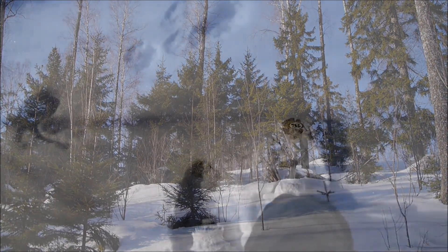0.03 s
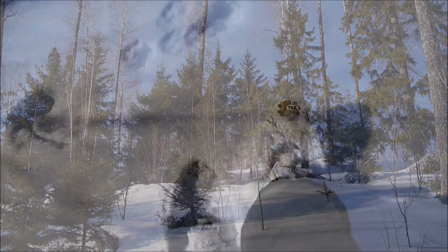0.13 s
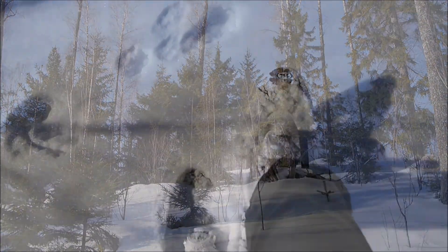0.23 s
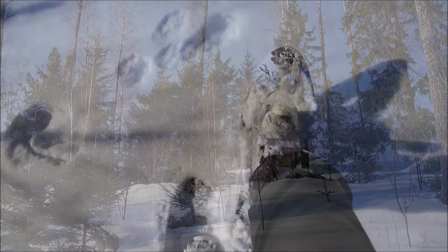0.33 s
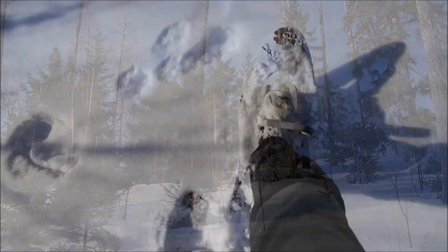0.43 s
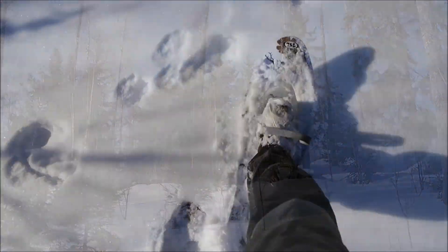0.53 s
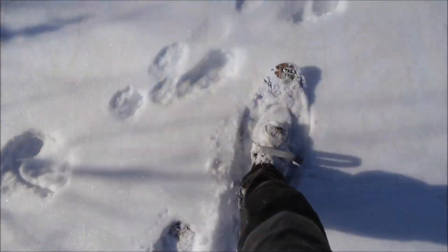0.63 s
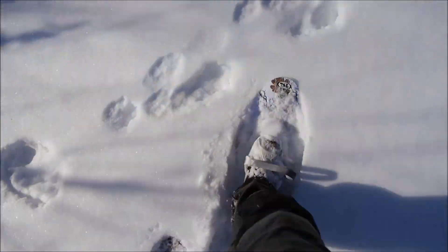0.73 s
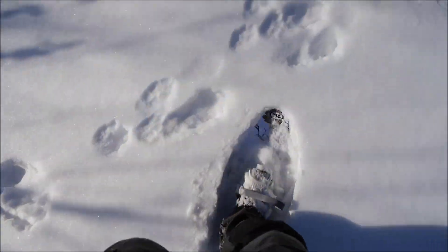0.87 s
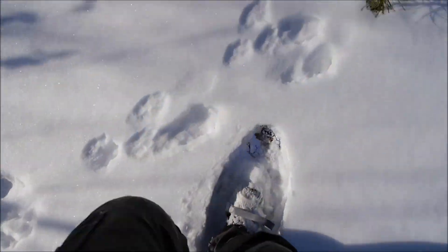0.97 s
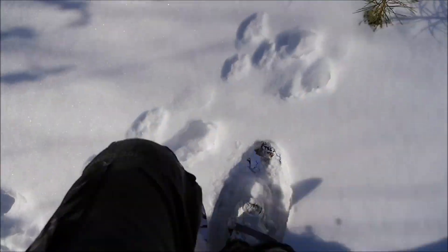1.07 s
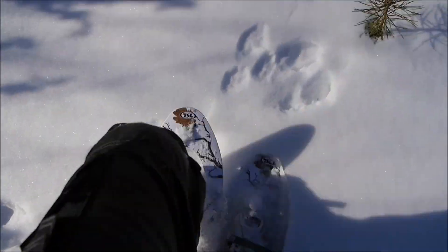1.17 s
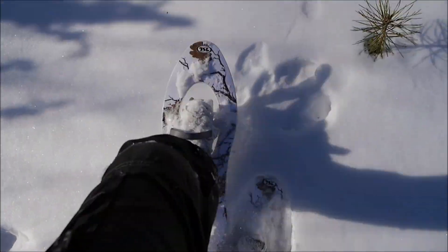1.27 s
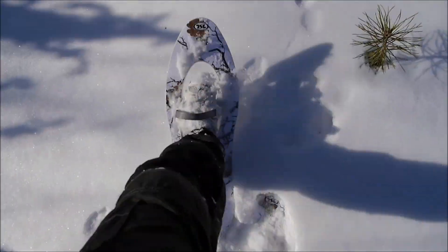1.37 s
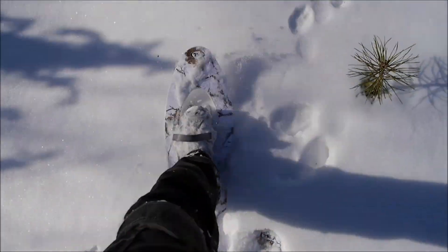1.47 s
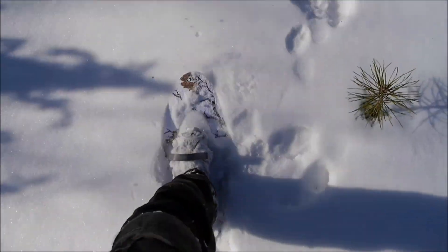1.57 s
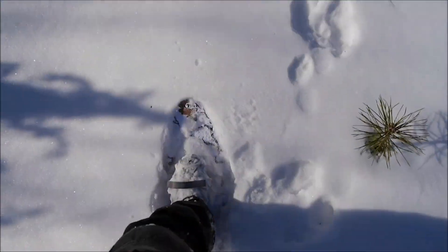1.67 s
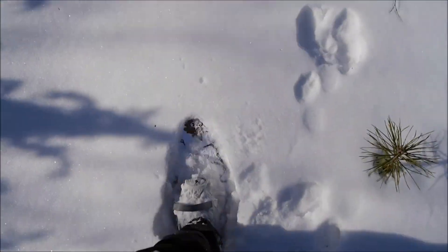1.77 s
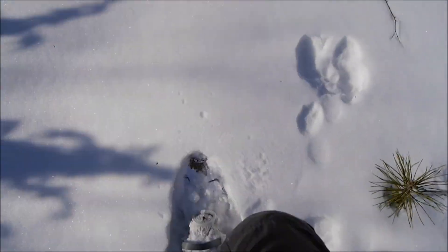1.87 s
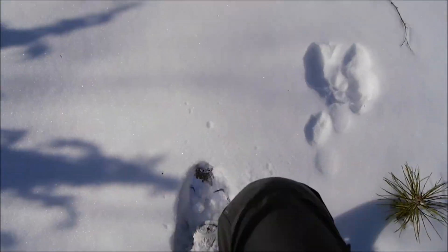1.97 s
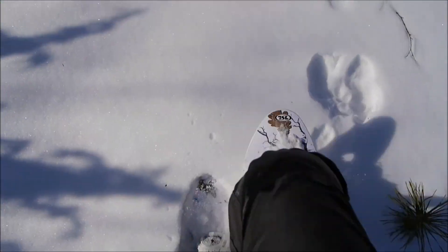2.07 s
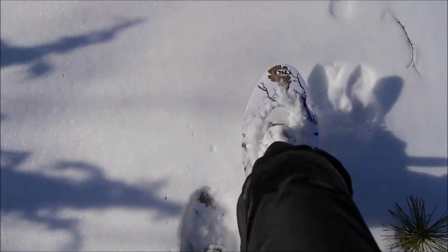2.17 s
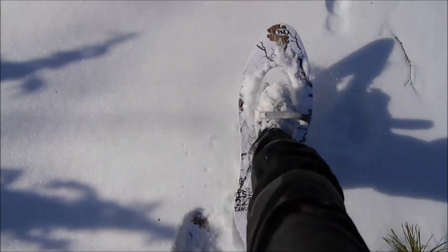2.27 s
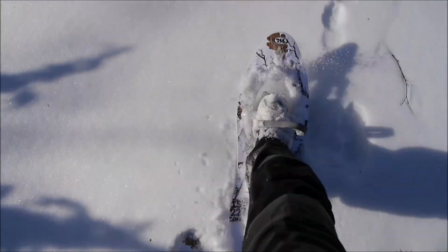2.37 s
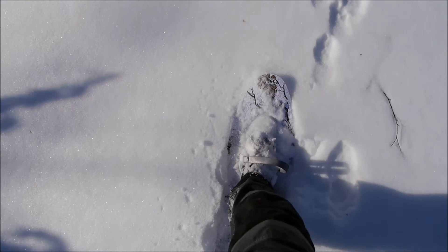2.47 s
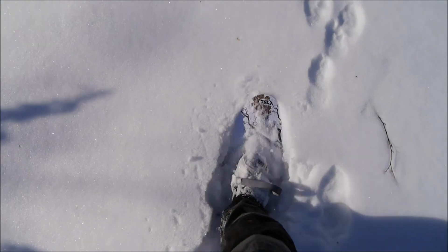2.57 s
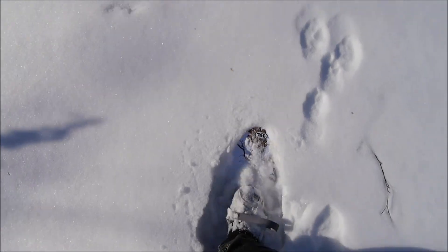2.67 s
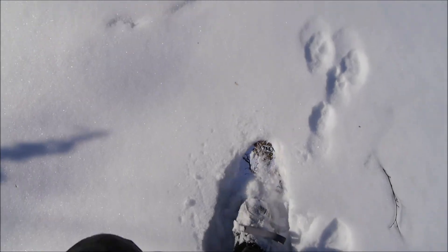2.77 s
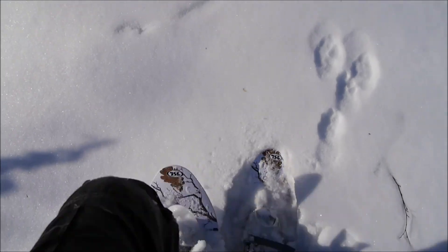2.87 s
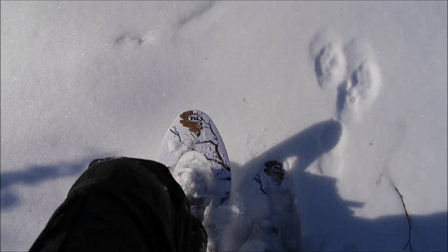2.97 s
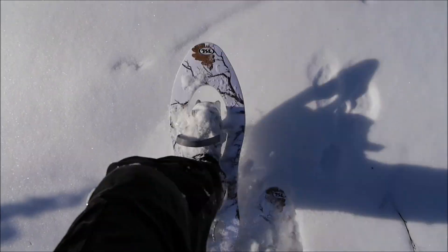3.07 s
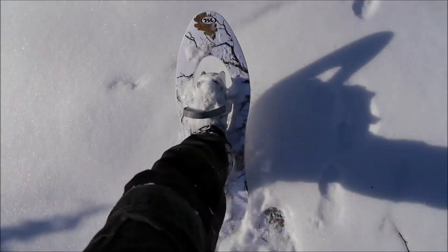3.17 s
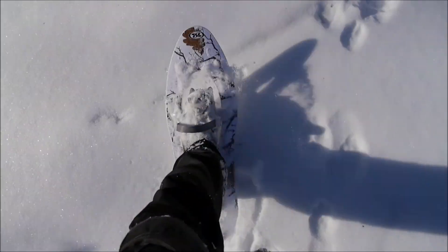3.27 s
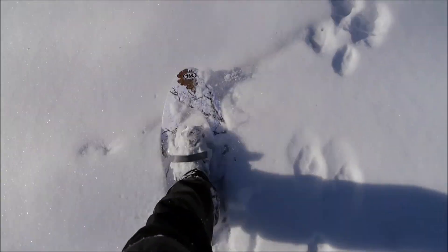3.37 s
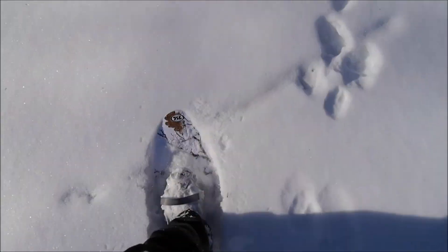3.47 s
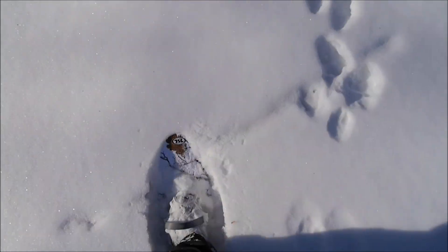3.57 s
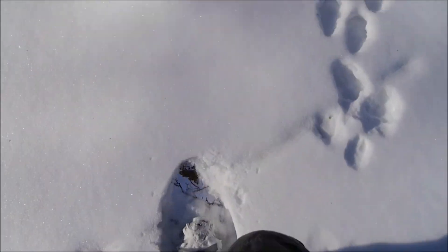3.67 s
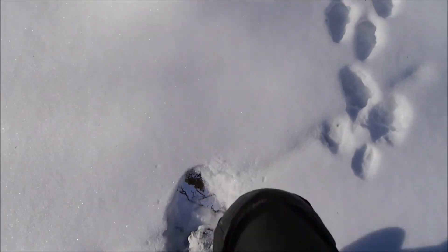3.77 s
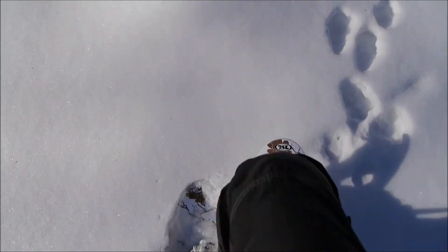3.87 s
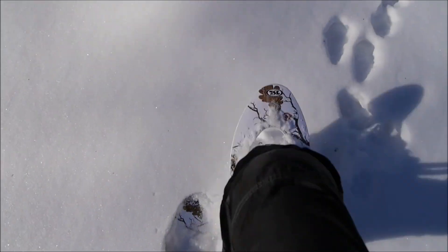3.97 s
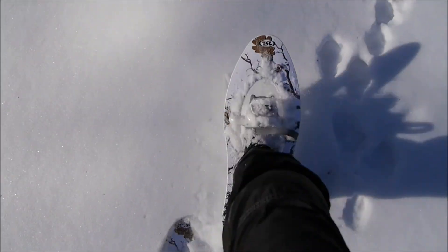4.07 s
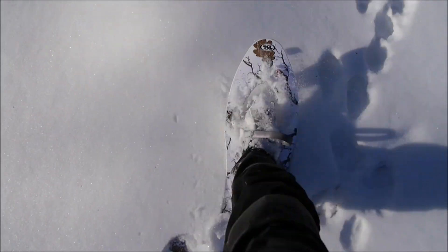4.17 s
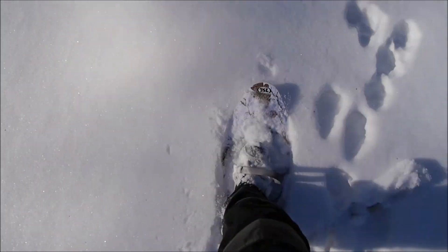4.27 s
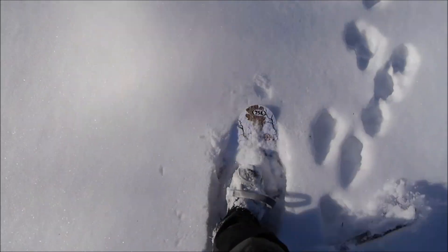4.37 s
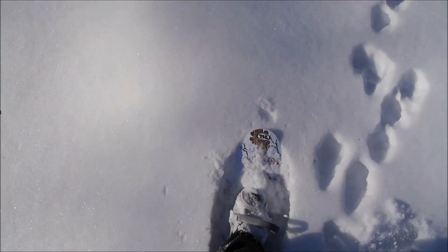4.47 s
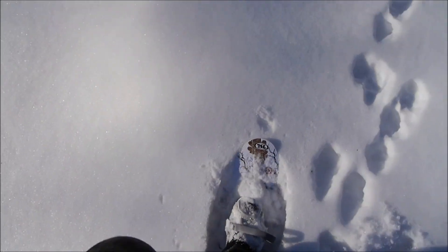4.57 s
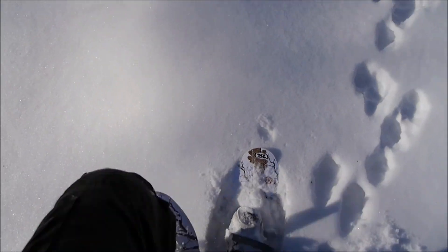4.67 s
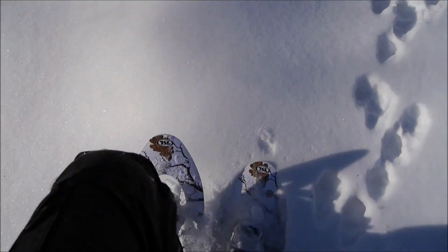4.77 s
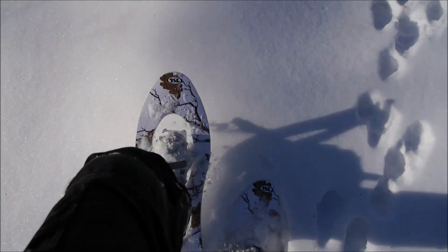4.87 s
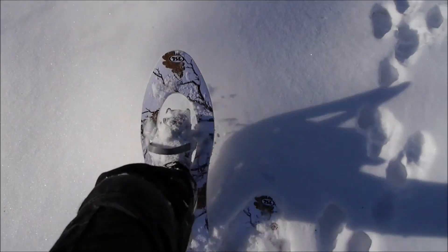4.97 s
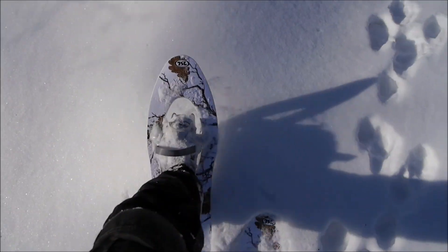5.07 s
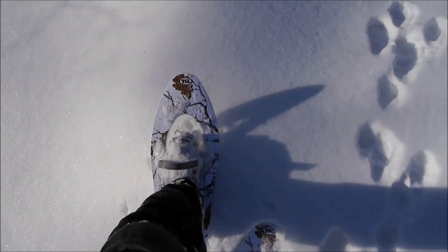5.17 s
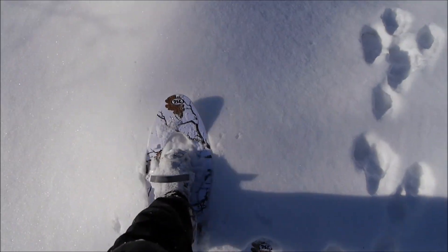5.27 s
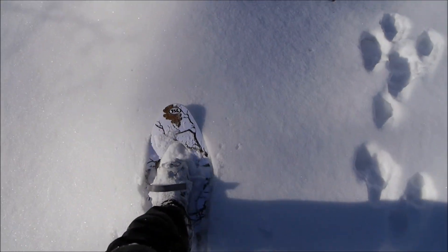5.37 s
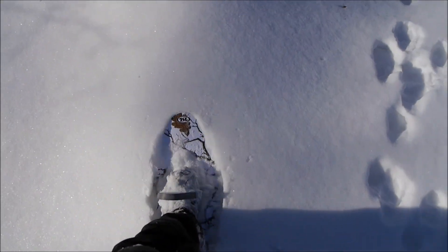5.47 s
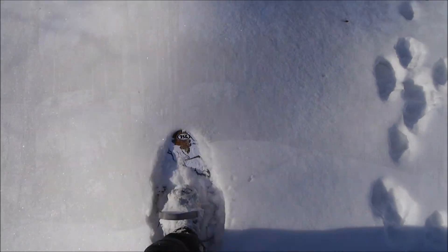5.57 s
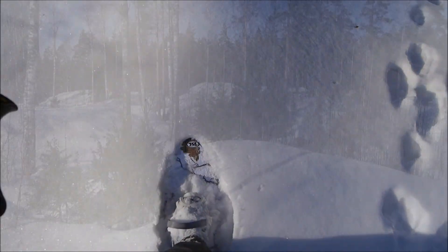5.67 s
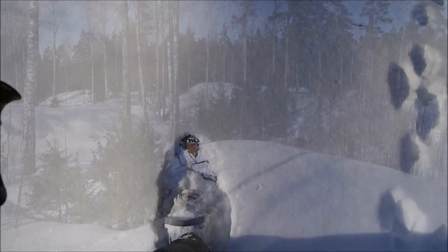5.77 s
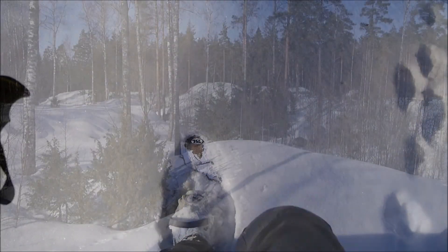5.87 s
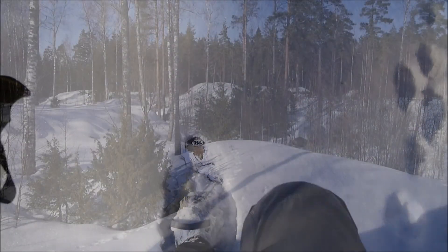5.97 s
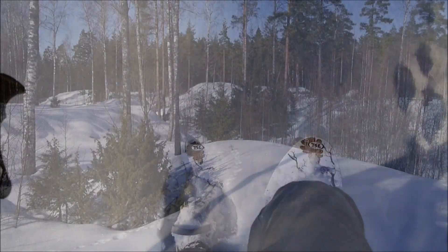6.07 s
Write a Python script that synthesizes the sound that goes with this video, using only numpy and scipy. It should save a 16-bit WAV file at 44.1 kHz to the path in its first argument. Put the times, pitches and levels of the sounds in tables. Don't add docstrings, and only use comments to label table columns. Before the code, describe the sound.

Six heavy, brittle snowshoe steps break icy crust with dry crackle, small knocks and soft low thuds in a nearly silent winter wood.

```python
import sys
import numpy as np
from scipy import signal
from scipy.fft import rfft, irfft, next_fast_len
from scipy.io import wavfile

SR = 44100
rng = np.random.default_rng(int(sys.argv[2]) if len(sys.argv) > 2 else 0)


def master_out(mix):
    frames = np.transpose(np.atleast_2d(mix))
    ceiling = np.clip(frames, -1, 1)
    pcm = np.round(ceiling * 32767).astype(np.int16)
    wavfile.write(sys.argv[1], SR, pcm)


def boost_factor(decibels):
    exponent = np.asarray(decibels, float) / 20
    return 10 ** exponent


N = 269451


def evened(x):
    return x / np.sqrt(np.mean(x ** 2) + 1e-20)


def spectrum_db(points, hz):
    f_hz, level_db = np.transpose(points)
    return np.interp(np.log(hz + 1), np.log(f_hz + 1), level_db)


def coloured(x, points):
    size = next_fast_len(N)
    gain = boost_factor(spectrum_db(points, np.fft.rfftfreq(size, 1 / SR)))
    return irfft(rfft(x, size) * gain, size)[..., :N]


def add(mix, start_s, sound):
    part = mix[:, round(start_s * SR):][:, :sound.shape[1]]
    part += sound[:, :part.shape[1]]


def ring(hz, cycles, phase=0):
    u = np.arange(int(6 * cycles / hz * SR) + 8) / SR * hz / cycles
    x = np.sqrt(u) * np.exp(-2.5 * u) * np.sin(2 * np.pi * cycles * u + phase)
    x = np.diff(x, append=0)
    return x / abs(x).max()


# t/s, left-right level/dB
LEAN = [(0.57, -5.5), (1.63, -0.5), (2.54, -6.5), (2.88, 0), (3.23, -5), (3.47, -0.5), (4.42, -6),
        (4.73, 1.5), (4.99, -4.5), (5.44, 1), (5.95, -3.5), (6.1, -3)]


def lean_db(t_s):
    shift_s, balance_db = np.transpose(LEAN)
    return np.interp(t_s, shift_s, balance_db)


# t/s, length/s, crust level/dB, packing re crust/dB, fizz re crust/dB
PRESSES = [(0.639, 0.17, -24.5, -6.5, 0.5), (0.799, 0.27, -28.5, 1, -3.0), (1.598, 0.14, -25, -1, 2.0),
           (1.722, 0.24, -26.0, 0.5, -3), (2.46, 0.16, -22.5, -6.5, -2), (2.595, 0.2, -25.5, -0.5, -1.5),
           (3.45, 0.11, -21.0, -4, 0.5), (3.544, 0.191, -26.5, -1, 0.5), (4.293, 0.16, -25, -4, 0),
           (4.423, 0.19, -29.5, 1, -6.0), (5.245, 0.251, -25, -4.5, -2.5), (5.509, 0.33, -30.5, 1.5, -2.5)]
CUTS = [(0.585, 0.065, -29.5, -4, -8.0), (1.367, 0.23, -27.0, -5.5, -6.5), (2.26, 0.19, -27.5, -4.5, -9),
        (3.242, 0.18, -28.5, -7, -5.5), (4.073, 0.15, -31.5, -5, -8.5), (5.077, 0.1, -31.5, -9.0, -7)]
DRAGS = [(1.121, 0.018, -39.0, -0.5, -6), (1.172, 0.1, -34.5, -5, -6.5), (1.316, 0.052, -49.5, 7.5, -1.5),
         (1.962, 0.19, -36, -3, -7.0), (2.813, 0.12, -43.0, 1, -2), (2.882, 0.15, -32.0, -3.5, -3.5),
         (3.099, 0.04, -38.5, -2.5, -3), (3.729, 0.17, -37, -3, -4), (3.858, 0.16, -35.5, -6.5, -8.5),
         (4.253, 0.047, -33, -4, -4), (4.649, 0.082, -45.0, 3, -5), (4.867, 0.089, -37.5, -2.5, -0.5),
         (5.193, 0.092, -33.5, -3.0, -6), (5.853, 0.072, -39.5, 0, -0.5), (5.984, 0.059, -45, -1, -14.5)]
SCUFFS = [(0.556, 0.029, -23.5, -7, -10), (0.668, 0.012, -23, -13.5, -18),
          (1.249, 0.046, -27.0, -6.5, -5.5), (1.603, 0.031, -23.5, -2, 1), (2.178, 0.02, -27, -9.5, -12.5),
          (2.504, 0.029, -23, -10, -3), (2.945, 0.019, -29.5, 2, -4.5), (3.052, 0.017, -25.0, -9, -5),
          (3.085, 0.005, -36.5, -11, 9.0), (3.141, 0.017, -30, 1, -4.0), (3.203, 0.024, -23.5, -9.5, -7),
          (3.428, 0.046, -22.0, -3.5, -4), (3.69, 0.019, -28.0, -13, 3), (3.992, 0.007, -33, -15, -13.0),
          (4.126, 0.004, -31, -2, -11.5), (4.238, 0.015, -20.0, -5.5, -6.5), (4.294, 0.039, -19.5, -15, -5),
          (4.592, 0.037, -37.5, -2, 3.0), (4.711, 0.018, -36.5, 2.0, -8), (4.788, 0.1, -26.5, -6.5, -5.5),
          (4.932, 0.048, -33.5, -1, -2), (5.013, 0.064, -31.0, 1, -4.0), (5.333, 0.011, -25.5, -7.0, -5),
          (5.936, 0.009, -32.5, -0.5, -11)]
# rise/s, release/(dB/s), drift of packing, crust, fizz over the move/dB
PRESS_SHAPE = (0.0456, 353, 0.86, -4.4, -7.5)
CUT_SHAPE = (0.035, 310, 4.2, 4.5, 4)
DRAG_SHAPE = (0.026, 350, 4.4, 3.3, 1.3)
SCUFF_SHAPE = (0.0073, 530, 0.45, 0.67, 0.96)
# packing, crust, fizz level/dB
SETTLE_DB = (-49.3, -45, -48.2)
# t/s, peak level/dB, f/Hz, cycles, rumble level/dB
THUDS = [(0.806, -22, 242, 0.73, -37), (1.261, -25, 257, 1.7, -49), (1.697, -16.5, 370, 2.7, -60),
         (1.781, -15.5, 213, 1.8, -46.5), (2.577, -25, 220, 2.8, -38), (2.903, -21.5, 385, 1, -47),
         (3.007, -36, 425, 2, -54), (3.151, -32.5, 231, 2, -57), (3.525, -13, 270, 0.62, -44),
         (4.234, -20, 360, 0.93, -54), (4.307, -19, 458, 1.1, -51), (4.355, -32, 250, 1.4, -48),
         (4.813, -22.5, 400, 1.5, -52.5), (5.539, -23, 263, 3, -49)]
SETTLE_S = 0.56
RUMBLE_DB, PACK_DB, FIZZ_DB = -2.5, 2.5, 4
SHAKE_DB, SHAKE_S = 25, 0.029


def load():
    t = np.arange(0, N + 64, 64) / SR
    power = (t >= SETTLE_S) * boost_factor(np.array(SETTLE_DB)[:, None]) ** 2 + 1e-12
    kinds = [(PRESSES, PRESS_SHAPE), (CUTS, CUT_SHAPE), (DRAGS, DRAG_SHAPE), (SCUFFS, SCUFF_SHAPE)]
    for moves, (rise_s, release_db_per_s, *drift_db) in kinds:
        for start_s, length_s, crust_db, pack_db, fizz_db in moves:
            progress = np.clip((t - start_s) / length_s, 0, 1)
            db = crust_db + np.array([[pack_db], [0], [fizz_db]])
            db = db + np.array(drift_db)[:, None] * progress
            db = db - release_db_per_s * np.maximum(t - start_s - length_s, 0)
            rise = np.clip((t - start_s) / rise_s, 0, 1)
            power = power + (boost_factor(db) * rise) ** 2
    shake = np.zeros(len(t))
    for start_s, *_, rumble_db in THUDS:
        swell = np.exp(-((t - start_s - SHAKE_S / 2) / SHAKE_S) ** 2)
        shake += boost_factor(rumble_db + SHAKE_DB) ** 2 * swell
    pack, crust, fizz = power
    rumble = boost_factor(RUMBLE_DB) ** 2 * pack + shake
    layers = [rumble, boost_factor(PACK_DB) ** 2 * pack, crust, boost_factor(FIZZ_DB) ** 2 * fizz]
    return [np.interp(np.arange(N) / SR, t, 10 * np.log10(row)) for row in layers]


def slips(per_s, depth_db, fade_s):
    jumps = (rng.random(N) < per_s / SR) * rng.exponential(1, N)
    x = signal.lfilter([1], [1, -np.exp(-1 / (fade_s * SR))], jumps)
    return depth_db * evened(np.tanh(0.7 * evened(x - x.mean())))


def crackle(load_db, per_s=110, level_db=44):
    out = np.zeros((2, N))
    for hz in (1500, 2360, 3530, 4900):
        chance, odds, sign, place = rng.random((4, N))
        struck = chance < per_s / 4 / SR
        size = struck * boost_factor(-3.5 * np.log(odds + 0.06)) * np.sign(sign - 0.5)
        train = size * boost_factor(load_db + level_db)
        both = np.array([train, train * np.sign(place - 0.5)])
        out += signal.oaconvolve(both, ring(hz, 1.7)[None])[:, :N]
    return out


# f/Hz, level/dB per Hz
SNOW = [(35, -50), (60, -15.5), (146, -13), (217, -2.5), (338, 2), (566, -2.5), (785, 3), (1170, -1.5),
        (2970, -5.5), (6740, -11), (10800, -13), (14600, -34), (16000, -118)]
LAYERS_HZ = (110, 600, 2600, 9000)
# f/Hz, side-mid level/dB
CRUNCH_SPREAD = [(60, -11), (150, -7.5), (380, -47), (950, -26), (2380, -4.5), (5980, -2.5), (15000, -3)]
SQUEAK_HZ, SQUEAK_PER_DB, SQUEAK_AT_DB = 2950, 0.02, -6.5


def crunch(count=30):
    layers_db = load()
    clumps_db = [slips(25, 1, 0.018), slips(47, 0.8, 0.014), slips(71, 1.1, 0.015), slips(91, 0.9, 0.015)]
    shared_db = slips(35, 1.03, 0.04)
    finer_db = layers_db[3] - layers_db[2] - FIZZ_DB - SQUEAK_AT_DB
    squeak_log_hz = np.log(SQUEAK_HZ) + SQUEAK_PER_DB * finer_db
    mid_side = np.zeros((2, N))
    for hz in np.geomspace(70, 15000, num=count):
        shares = [np.interp(np.log(hz), np.log(LAYERS_HZ), row) for row in np.eye(4)]
        per_s = 330 * (hz / 1000) ** 0.75
        at = np.flatnonzero(rng.random(N) < per_s / SR)
        load_db = shared_db[at]
        for share, layer_db, clump_db in zip(shares, layers_db, clumps_db):
            load_db = load_db + share * (layer_db[at] + clump_db[at])
        load_db += 3.5 * np.exp(-((np.log(hz) - squeak_log_hz[at]) / 0.25) ** 2)
        odds, sign, place = rng.random((3, len(at)))
        size = boost_factor(-2.4 * np.log(odds + 0.038)) * np.sign(sign - 0.5)
        grain = ring(hz, 3.08, rng.uniform(0, np.pi))
        per_grain = np.sqrt(hz * N / len(at)) / np.linalg.norm(grain)
        train = evened(size) * boost_factor(load_db + spectrum_db(SNOW, hz)) * per_grain
        both = np.zeros((2, N))
        both[:, at] = train, train * np.sign(place - 0.5)
        mid_side += signal.oaconvolve(both, grain[None])[:, :N]
    mid_side += crackle(layers_db[2] + shared_db)
    mid = mid_side[0]
    side = boost_factor(-2.5) * coloured(mid_side[1], CRUNCH_SPREAD)
    lean = boost_factor(lean_db(np.arange(N) / SR) / 2)
    high = signal.lfilter(*signal.butter(1, 1100, "high", fs=SR), mid)
    left = mid + side + (lean - 1) * high
    right = mid - side + (1 / lean - 1) * high
    return boost_factor(-40.5) * np.array([left, right])


# t/s, peak level/dB, f/Hz, splinter re peak/dB
SNAPS = [(0.561, -8.5, 3100, -11), (0.57, -9, 2980, -18), (0.664, -15, 3900, -5), (0.705, -16, 4750, -13),
         (1.14, -22, 3600, -14), (1.234, -14, 1770, -22.5), (1.339, -22, 1280, -27),
         (1.373, -15.5, 1520, -19), (1.431, -10, 2370, -10), (1.561, -11, 2670, -18),
         (2.308, -10, 1730, -25), (2.431, -12, 2440, -18), (2.52, -6, 1720, -21), (3.474, -9, 3900, -14),
         (3.344, -9.5, 3080, -8), (3.441, -3.5, 4400, -18), (3.462, -4.5, 3920, -7),
         (4.142, -3.5, 1430, -23), (4.167, -12.5, 2540, -28), (4.185, -14, 2790, -10),
         (4.298, -11, 1630, -13), (4.432, -8.5, 4070, -13), (4.798, -11, 4120, -21),
         (4.836, -11.5, 1880, -4.5), (4.868, -14, 2500, -14), (5.099, -11, 2410, -13),
         (5.256, -12, 1830, -20), (5.337, -10, 1540, -6)]
# t/s, peak level/dB, f/Hz, splinter re peak/dB
SQUEALS = [(2.267, -11, 2400, -27), (3.064, -11, 4900, -25), (3.093, -16, 5400, -10),
           (3.211, -7, 2700, -18), (3.219, -7, 2720, -18), (3.285, -14, 2750, -20), (3.325, -15, 2800, -20),
           (4.11, -17, 2800, -15), (4.81, -12, 3000, -18), (4.862, -12, 5400, -16), (4.89, -14, 4800, -16),
           (5.165, -14, 3100, -18)]
# t/s, peak level/dB, splinter re peak/dB
KNOCKS = [(0.845, -11, -12), (1.121, -17.5, -25), (1.16, -19.5, -20), (1.217, -19, -20), (1.786, -9, -8),
          (1.874, -19, -16), (2.132, -19, -10), (2.337, -13.5, -23), (2.547, -11, -2), (2.584, -12.5, 0),
          (2.909, -12, -12), (2.948, -13, -22), (3.624, -14, -3), (3.658, -18, 6.5), (3.675, -21, 7),
          (3.708, -18.5, 8.5), (3.818, -23, -4), (3.953, -21, -25), (4.237, -12, -5), (4.605, -15, -11),
          (4.733, -21, -25), (4.819, -11, -14), (5.028, -20, -6), (5.118, -15.5, -4), (5.3, -13, -14),
          (5.386, -12.5, -7), (5.426, -12, -23), (5.544, -23, 6), (5.803, -13.5, -29), (5.937, -14.5, -33)]
SNAP_T60_S, SNAP_CYCLES = 0.031, 3.3
SQUEAL_T60_S, SQUEAL_CYCLES = 0.05, 9
KNOCK_T60_S, KNOCK_HZ = 0.027, 793


def snaps():
    out = np.zeros((2, N))
    t = np.arange(3000) / SR
    tick = ring(3800, 1.3)
    splinter_band = signal.butter(2, [4500, 12000], "band", fs=SR)
    plates = [(*row, SNAP_T60_S, SNAP_CYCLES) for row in SNAPS]
    plates += [(*row, SQUEAL_T60_S, SQUEAL_CYCLES) for row in SQUEALS]
    plates += [(s, db, KNOCK_HZ, rel_db, KNOCK_T60_S, SNAP_CYCLES) for s, db, rel_db in KNOCKS]
    for start_s, peak_db, hz, splinter_db, t60_s, cycles in plates:
        noise = rng.standard_normal((4, len(t)))
        fade = boost_factor(-60 * t / t60_s) * np.minimum(t / 0.00049, 1)
        crack = ring(hz, 1.8)[:len(t)]
        crack[:len(tick)] += 0.45 * tick[:len(crack)]
        crumble = boost_factor(-12) * evened(signal.lfilter(ring(hz, cycles), 1, noise[0])) * fade
        crumble[:len(crack)] += boost_factor(-5) * crack
        bright = evened(signal.lfilter(*splinter_band, noise[1] + 0.92 * noise[2:]))
        splinters = boost_factor(splinter_db - 4.5) * bright * fade * np.minimum(t / 0.003, 1)
        pan_db = lean_db(start_s) / 2
        add(out, start_s, boost_factor(peak_db) * (crumble + splinters) * boost_factor([[pan_db], [-pan_db]]))
    return out


def thuds():
    out = np.zeros((2, N))
    for start_s, peak_db, hz, cycles, _ in THUDS:
        push = boost_factor(peak_db + 3) * ring(hz, cycles)
        add(out, start_s + 0.00284, push * boost_factor([[1.2], [-1.2]]))
    return out


# f/Hz, level/dB per Hz
AIR = [(18, -55), (30, -25), (81, -25), (215, -4.5), (512, -0.5), (1860, -9), (2120, -8), (2610, -11.5),
       (9220, -23), (14800, -28), (16000, -21)]
# f/Hz, side-mid level/dB
AIR_SPREAD = [(60, 0), (240, -1), (950, 7.5), (3770, 11), (15000, -2)]
AIR_DB = -58


def air():
    mid, side = coloured(rng.standard_normal((2, N)), AIR)
    side = coloured(side, AIR_SPREAD)
    return boost_factor(AIR_DB) * np.array([mid + side, mid - side]) / mid.std()


def scene():
    return crunch() + snaps() + thuds() + air()


def top_cut(x):
    return signal.sosfilt(signal.butter(12, 17040, fs=SR, output="sos"), x)


def record(dry):
    wind_cut = signal.butter(1, 50, "high", fs=SR, output="sos")
    band_limit = signal.firwin(601, 15820, window=("kaiser", 8), fs=SR)
    mix = signal.sosfilt(wind_cut, dry)
    mix = signal.oaconvolve(mix, band_limit[None], "same")
    return top_cut(mix)


dry = scene()
out = record(dry)
master_out(out)
```